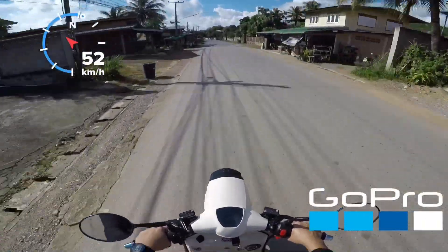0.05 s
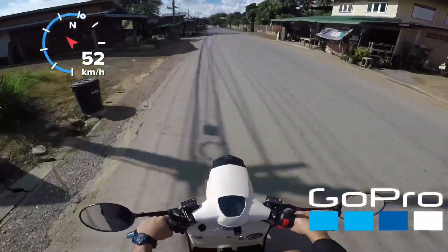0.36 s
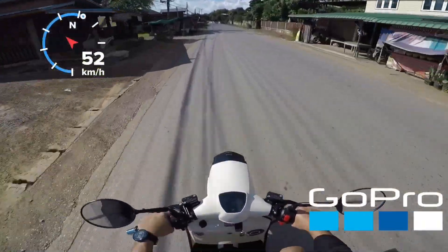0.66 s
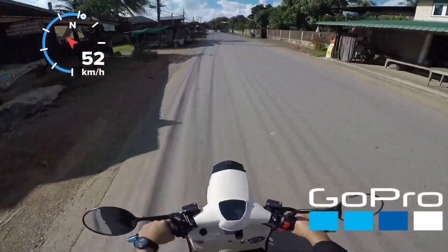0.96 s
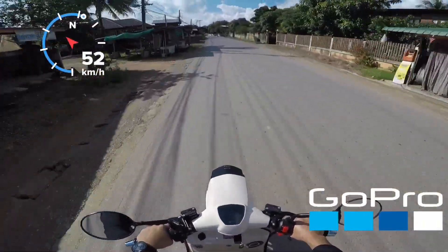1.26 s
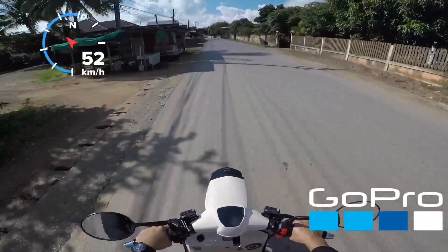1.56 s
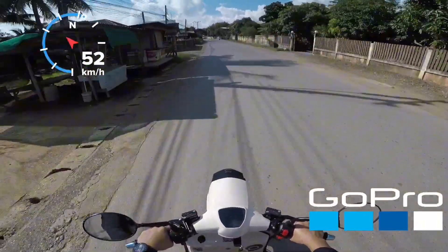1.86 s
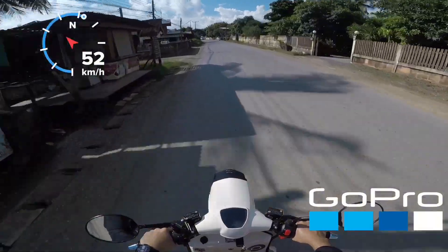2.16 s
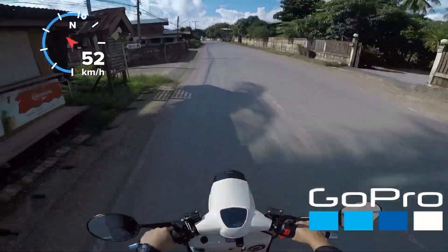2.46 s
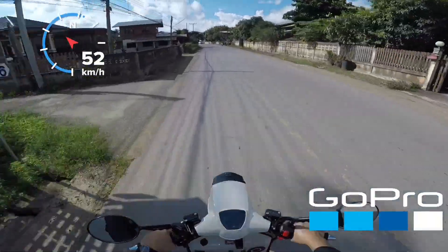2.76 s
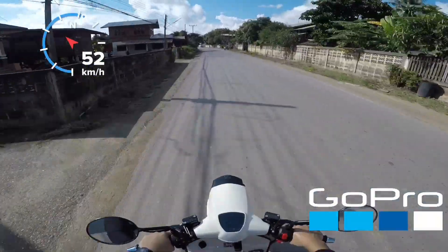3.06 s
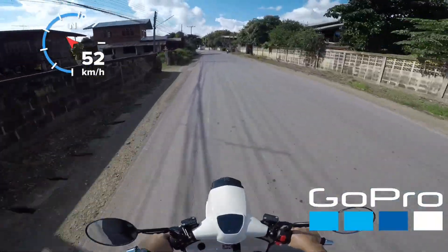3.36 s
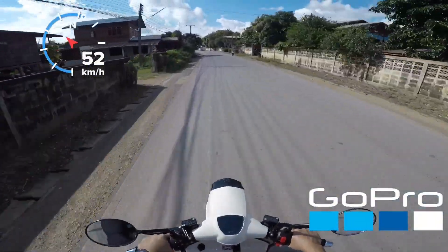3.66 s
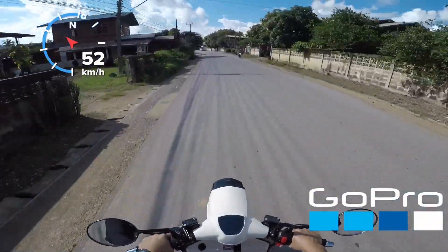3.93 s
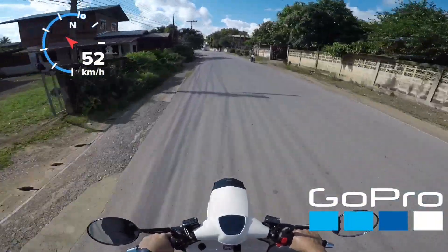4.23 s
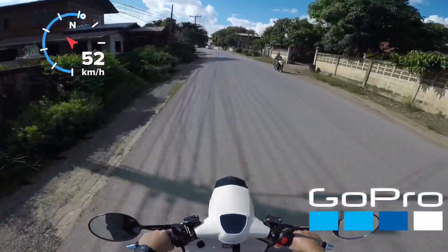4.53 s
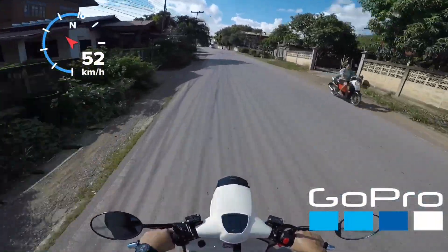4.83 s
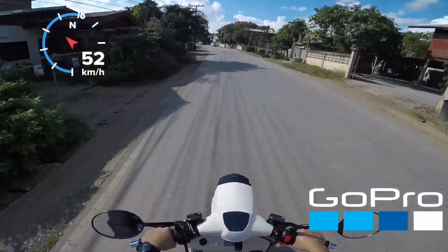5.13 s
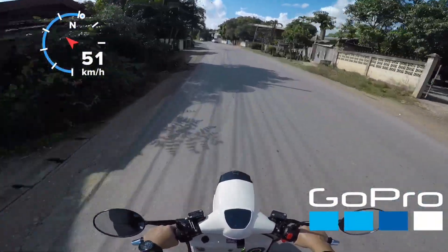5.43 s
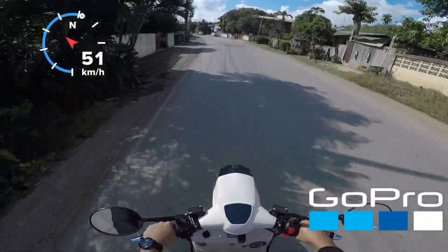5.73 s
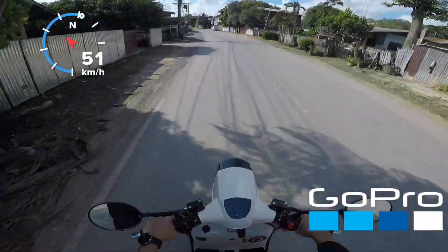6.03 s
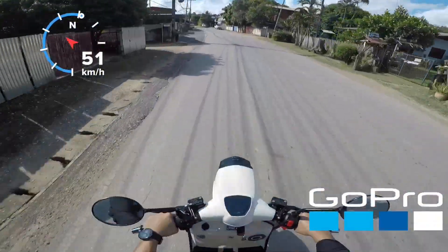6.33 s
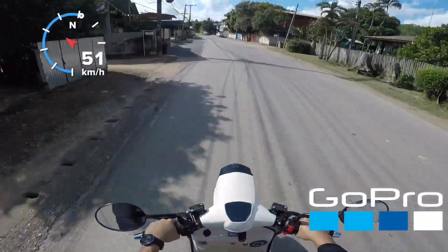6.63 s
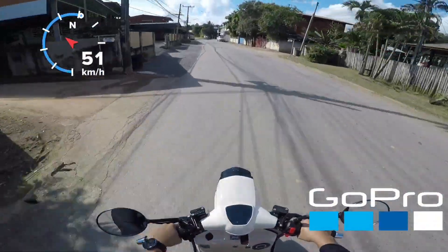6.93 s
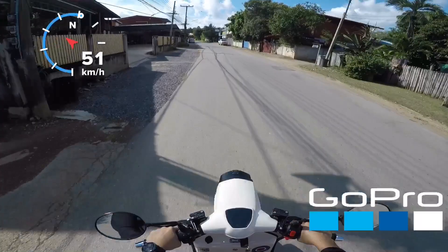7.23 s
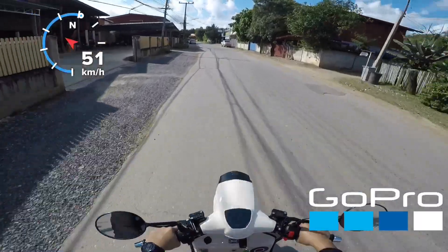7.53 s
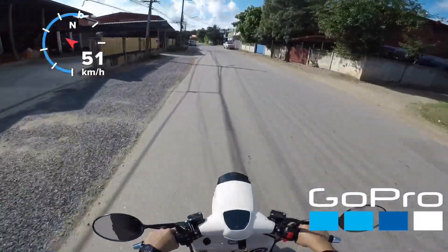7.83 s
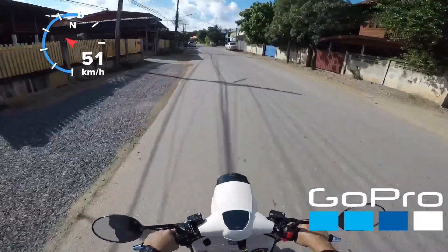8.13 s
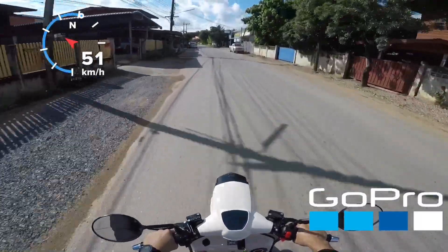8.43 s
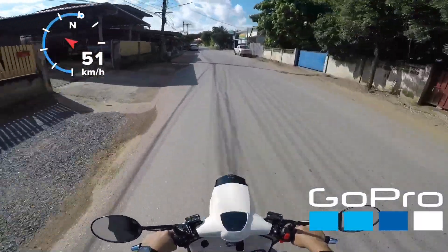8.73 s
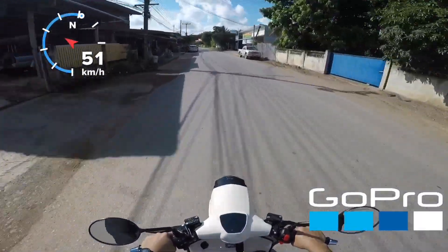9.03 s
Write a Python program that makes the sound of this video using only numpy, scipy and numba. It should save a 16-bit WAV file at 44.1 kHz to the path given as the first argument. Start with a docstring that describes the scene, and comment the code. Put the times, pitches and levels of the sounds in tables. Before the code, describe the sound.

Wind rumbles, rushes and hisses against the microphone during a scooter ride, with brief lulls and a faint low road rumble beneath.

```python
"""Scooter ride wind on the mic

Wind hits the two microphone ports of a camera on a scooter at about 50 km/h. Large eddies buffet each
port on its own or knock on both, smaller ones rush and tear past, the finest spit and hiss. The flow
swells in gusts, drones once and drops away in brief lulls, over a faint road rumble.
The camera widens the stereo image and holds the bass and the peaks down."""
import sys
import numpy as np
from scipy import signal
from scipy.fft import rfft, irfft, next_fast_len
from scipy.io import wavfile
from scipy.ndimage import uniform_filter1d, minimum_filter1d
from numba import njit

SR = 44100
rng = np.random.default_rng(int(sys.argv[2]) if len(sys.argv) > 2 else 0)


def waveform_to_disk(signal):
    """Save audio, clipped to [-1, 1], as 16-bit WAV at the path in sys.argv[1]."""
    frames = np.transpose(np.atleast_2d(signal))
    scaled = np.clip(frames, -1, 1) * 32767
    samples = np.round(scaled).astype(np.int16)
    wavfile.write(sys.argv[1], SR, samples)


N = 404838

# slow ride of the airflow over the ports: t/s, level/dB
FLOW = [(0, 0.5), (0.12, -1), (0.3, 1.5), (0.9, 1.5), (1.38, -0.5), (1.55, 1.0), (2.2, 0.4), (4.05, 0.5),
        (4.5, 1.5), (4.8, -2), (5.52, 1.5), (5.95, -0.9), (6.55, -3), (7.0, -2), (7.6, -1.5), (8.25, -1.5),
        (8.65, -0.5), (8.88, -1.4), (9.18, -0.5)]
# gusts on top of the flow: crest t/s, length/s, rise/dB
GUSTS = [(0.006, 0.03, 5.5), (0.42, 0.055, 1.5), (0.769, .12, 3.4), (0.947, 0.044, 3.5), (0.983, .06, 2.5),
         (1.06, 0.057, 1.5), (1.848, 0.2, 2), (2.568, 0.055, 1.5), (2.816, 0.076, 2), (3.057, 0.11, 0.5),
         (3.246, 0.052, 1), (3.416, 0.044, 1.5), (3.915, .12, 1.5), (4.174, 0.12, 2.5), (4.33, 0.05, 3),
         (4.493, .05, 1), (5, 0.033, 3), (5.047, .04, 5.5), (5.156, 0.096, 4), (5.474, 0.073, 2.5),
         (5.78, 0.14, 2.5), (5.946, 0.12, 3), (6.379, 0.07, 5), (6.645, 0.059, 3.5), (6.718, .07, 4),
         (6.848, 0.16, 4), (6.942, 0.14, 4.5), (7.03, .05, 3), (7.51, .12, 2.4), (8.127, .2, 2.5),
         (8.243, 0.06, 2.5), (8.335, 0.067, 3), (8.67, 0.054, -0.5), (9.128, .07, 2.5)]
# the flow lifts off the ports, and once, at 6.4 s, the whole sound dips for a moment: start t/s, end t/s,
# depth/dB (scaled per layer), let-go/s, catch/s
LULLS = [(1.08, 1.132, 2.8, .02, 0.022), (1.168, 1.21, 3.6, .012, 0.027), (1.328, 1.46, 1.3, .02, 0.033),
         (2.642, 2.728, 6.8, 0.07, 0.028), (2.871, 2.975, 9.2, 0.0099, 0.02),
         (3.167, 3.227, 5.3, .02, 0.022), (3.277, 3.402, 9.2, 0.02, 0.0075),
         (3.451, 3.51, 6.1, 0.014, .016), (3.542, 3.733, 6.9, 0.011, 0.2), (4.348, 4.463, 6.8, 0.016, .016),
         (5.262, 5.297, 5, .05, .008), (5.858, 5.874, 1.8, .015, .02), (6.403, 6.422, 4.2, .015, 0.023),
         (6.525, 6.545, 1.5, .015, .015), (6.759, 6.778, 3.3, .01, .012), (7.06, 7.095, 2.6, .012, .03),
         (7.709, 7.76, 2.1, 0.018, 0.033), (8.465, 8.533, 4, 0.028, 0.068),
         (8.941, 9.076, 3.5, 0.052, 0.02)]
# side the flow strikes from: t/s, left minus right/dB (scaled per layer)
FLOW_SIDE = [(0.0, -1), (0.6, -0.5), (2.1, 2), (3.8, 2), (4.45, 3), (4.85, -1), (5.4, 1.5), (6.15, -3),
             (7.6, 0), (8.55, 0), (9.16, 0.5)]
# tone of the turbulent pressure behind the ports: f/Hz, relative level/dB
TURBULENCE = [(24, -12), (66, -2), (110, 1.1), (175, -1.5), (340, -9.5), (480, -11), (640, -15),
              (1190, -20.5), (2190, -28.5), (4250, -41), (5090, -45), (6100, -43.5), (7770, -48.5),
              (10300, -68)]
# large eddies that thump a port: crest t/s, length/s, rise/dB, left minus right/dB
THUMPS = [(0.04, 0.071, -0.5, 0), (0.17, 0.21, 1, -2), (0.396, .2, 0, 4), (0.683, 0.17, 2, 4.5),
          (1.053, 0.11, 1.5, 2.5), (1.56, 0.23, -1.5, 6.5), (1.98, 0.22, -1.2, 11), (2.793, 0.08, 7, -3.5),
          (3.02, 0.16, 5, -8.5), (3.382, 0.067, 5.5, 6), (3.87, 0.22, 4, -4), (4.069, 0.16, 3, -2.5),
          (4.55, .14, -0.5, -2), (4.678, 0.074, 5, 0), (4.925, 0.5, 3, -2), (5.107, 0.15, 1.2, 5),
          (5.455, .13, 0, -2), (5.568, 0.16, -3, 10.5), (6.473, 0.18, 5.5, 5.5), (6.626, 0.33, 3, 3.5),
          (6.897, 0.51, 2.5, 6), (7.16, 0.058, 3.5, -1.5), (7.76, 0.3, 7.5, 1), (7.975, 0.31, 5, -1),
          (8.114, .1, 1.5, -2), (8.258, .11, 4, -1), (8.56, 0.18, 1, -1.5), (8.737, 0.22, 4.5, -2),
          (9.038, 0.62, 4, -1)]
# single eddies on both ports; the long ones boom: crest t/s, f/Hz, length/s, glide/(octaves/s), level/dB
KNOCKS = [(0.188, 80, .04, -6, -9.5), (0.56, 132, 0.028, 0, -8), (0.667, 108, 0.019, 0, -12),
          (1.065, 155, .026, 0, -10.5), (1.495, 90, 0.029, 0, -10), (2.293, 126, 0.082, -1, -11),
          (3.033, 89.6, 0.09, -1, -19), (3.384, 154, 0.019, 0, -12), (3.936, 122, 0.023, 0, -10),
          (4.161, 129, 0.018, 0, -10), (4.26, 150, 0.026, 0, -9), (4.68, 128, .035, -6, -7),
          (4.943, 135, .028, 0, -14), (5.3, 185, 0.042, -6, -12.5), (6.465, 136.6, 0.093, 5.5, -13),
          (6.623, 114, .054, -4, -6), (6.706, 110, .026, 0, -9), (6.762, 163, 0.025, 0, -6),
          (7.148, 215, 0.019, 0, -9), (7.534, 158, .028, 0, -7), (7.745, 128, .075, -4, -9),
          (7.92, 142, .028, -8, -2), (7.96, 99, 0.089, -2, -10), (8.105, 122, 0.2, 4, -13.5),
          (8.119, 190, 0.037, -6, -8), (8.262, 113, 0.07, -8, -8), (8.44, 102, 0.023, 0, -4),
          (8.545, 86, 0.095, 6, -13.5), (8.66, 87.6, 0.052, 8, -8), (9.139, 131, 0.029, 0, -8)]
# eddies peel off the camera in step and drone: t/s, f/Hz, level/dB
SHEDDING = [(1.8, 53, -40), (1.95, 54, -20), (2.12, 70, -20.5), (2.28, 60.6, -19.5), (2.38, 64, -27),
            (2.43, 86, -25), (2.52, 80, -12), (2.58, 79, -23), (2.64, 67, -45)]
# harmonics one to four of the drone: relative level/dB
DRONE_HARMONICS = [-1, 0.5, -3.5, -14]
# the right port rings a little higher than the left: f/Hz, left minus right/dB
PORT_MISMATCH = [(3000, 0), (6500, -0.5), (7300, -3), (8000, -6.5), (10000, -5)]
# the camera's EQ on the difference between the ports: f/Hz, gain/dB
WIDENING = [(40, -5.5), (107, -0.1), (250, 3), (480, 7), (740, 11.5), (900, 12.5), (2300, 3.5),
            (3300, -3.8), (4250, -5.5), (5100, 1.5), (5750, -.5), (7800, 0.5)]
# mix of each eddy size: base level/dB, response to flow/(dB/dB), drift/(dB/s), share of FLOW_SIDE
BUFFET = (-15.5, .5, -0.05, 1.04)
RUSH = (-21, 0.67, 0.22, 0.33)
TEAR = (-30.5, 1, 0.06, -0.3)
HISS = (-39.5, 1.11, -0.12, 1.5)

THROB_DB, THROB_PER_THUMP = -1.3, 0.8  # weight near 90 Hz in the rumble; its growth per dB of thump
BUFFET_PAN_DB, BUFFET_PAN_DB_PER_S = -1.8, -0.3  # the large eddies wander over to the right port
PAN_SPLIT = np.array([[.5], [-.5]])  # shares a left-minus-right balance between the ports


def buffet(flow_db):
    """The largest eddies thump each port on its own; the heavy ones gather into a deep throb."""
    thump_db = sum(db * swell(s, length) for s, length, db, _ in THUMPS)
    pan_db = sum(pan * swell(s, length) for s, length, _, pan in THUMPS)
    pan_db = pan_db + BUFFET_PAN_DB + drift(BUFFET_PAN_DB_PER_S)
    throb_db = THROB_DB + THROB_PER_THUMP * thump_db + 0.6 * flutter(2.5)[0]
    rumble = eddies(17, 330)
    throb = filtered(rumble, lambda f: 1 / (1 + (55 / f) ** 6 + (f / 135) ** 6))
    weighted = throb * undb(throb_db / 2) + (rumble - throb) * undb(-throb_db / 2)
    rocking_db = 0.5 * flutter(14, channels=2)  # lesser eddies rock each port at random
    thumping = in_step(weighted, thump_db) * undb(thump_db + rocking_db)
    return placed(thumping, BUFFET, flow_db, pan_db) * duck_under_drone(depth_db=1)


def in_step(ports, thump_db, narrowing=0.11):
    """A heavy eddy is wider than the gap between the ports, so it pushes on both more alike."""
    common = ports.mean(axis=0)
    return common * undb(narrowing * thump_db) + (ports - common) * undb(-narrowing * thump_db)


def wind(flow_db, lull_db):
    """Rush, tear and hiss: the smaller the eddies, the burstier they are and the more a lull takes away."""
    gust = flutter(32)  # covers both ports
    packet = flutter(190, channels=2)  # short packets of eddies hit one port at a time
    rush = unit(eddies(290, 1137) * undb(0.65 * gust + 1.27 * packet))
    tear = unit(eddies(1134, 3830) * undb(gust + 1.7 * packet))
    finest = eddies(2884, 12000)
    spit = flutter(900, channels=2)  # the finest break up in spits of about a millisecond
    hiss = unit(finest * undb(gust + 1.6 * packet + 0.89 * spit))
    # a lull shelters the right port more than the left
    return (placed(rush, RUSH, flow_db - 0.81 * lull_db, pan_db=0.61 * lull_db + 1.0)
            + placed(tear, TEAR, flow_db - 0.62 * lull_db, pan_db=0)
            + placed(hiss, HISS, flow_db - 1.47 * lull_db, pan_db=lull_db))


def knocks():
    """Compact eddies roll over the camera: a few cycles each, alike in both ports, some with a glide."""
    out = np.zeros(N)
    for crest_s, hz, length_s, glide, db in KNOCKS:
        envelope = swell(crest_s, length_s)
        active = np.flatnonzero(envelope > 1e-6)
        t = active / SR - crest_s
        cycles = hz * (t + np.log(2) * glide * t ** 2 / 2)
        out[active] += undb(db) * envelope[active] * np.sin(2 * np.pi * cycles)
    return out


def drone():
    """Eddies shed at a nearly even rate hum in both ports, then break up into rumble again."""
    rate_hz, level_db = curves(SHEDDING)
    t = np.arange(N) / SR
    gate = (t > SHEDDING[0][0]) & (t < SHEDDING[-1][0])
    wavering_hz = rate_hz * (1 + 0.0175 * flutter(12.7)[0])
    phase = 2 * np.pi * np.cumsum(wavering_hz) / SR
    hum = sum(undb(db + 2.1 * flutter(8, channels=2)) * np.sin(k * phase)
              for k, db in enumerate(DRONE_HARMONICS, 1))
    return unit(hum) * undb(level_db) * gate


def duck_under_drone(depth_db):
    """Gain of the loose rumble, which gives way as the eddies fall in step."""
    _, drone_db = curves(SHEDDING)
    return undb(-depth_db * undb(drone_db - drone_db.max()))


def road():
    """The road shakes the whole camera, so both ports get the same deep rumble around 21 Hz."""
    shake = filtered(rng.standard_normal(N), lambda f: 1 / np.hypot(1, 2.4 * (f / 21 - 21 / f)))
    return unit(shake) * undb(-51)


def airflow():
    """Strength of the flow in dB: its slow ride, the gusts and a slight constant waver."""
    slow_db, = curves(FLOW)
    gust_db = sum(db * swell(s, length) for s, length, db in GUSTS)
    return slow_db + gust_db + 0.16 * flutter(5.3)[0]


def lulls():
    """Dip in dB while the flow is off the ports; each lull lets go and catches again at its own pace."""
    t = np.arange(N) / SR
    return sum(db * np.clip(np.minimum((t - start) / let_go_s, (end - t) / catch_s) + .5, 0, 1)
               for start, end, db, let_go_s, catch_s in LULLS)


def eddies(low_hz, high_hz):
    """Pressure noise from one range of eddy sizes; each port meets its own."""
    def band(f):
        return response(TURBULENCE, f) / np.sqrt((1 + (low_hz / f) ** 8) * (1 + (f / high_hz) ** 8))
    return unit(filtered(rng.standard_normal((2, N)), band))


def placed(ports, layer, flow_db, pan_db):
    """The flow rides a layer's level and balance; pan_db leans it further left."""
    base_db, per_flow, drift_db_per_s, side_share = layer
    side_db, = curves(FLOW_SIDE)
    balance_db = (side_share * side_db + pan_db) * PAN_SPLIT
    return ports * undb(base_db + per_flow * flow_db + drift(drift_db_per_s) + balance_db)


def swell(crest_s, length_s):
    """An eddy passing by: a smooth rise from 0 to 1 and back."""
    from_crest = (np.arange(N) / SR - crest_s) / length_s
    return np.cos(np.pi * np.clip(from_crest, -.5, .5)) ** 2


def flutter(rate_hz, channels=1):
    """Random modulation at rms 1, no faster than about rate_hz."""
    return unit(filtered(rng.standard_normal((channels, N)), lambda f: 1 / (1 + (f / rate_hz) ** 2)))


def drift(db_per_s):
    """A steady fade in dB that passes zero halfway through the ride."""
    return db_per_s * (np.arange(N) - N / 2) / SR


def curves(table):
    """One automation curve for each column after t/s."""
    times, *columns = np.transpose(table)
    return [np.interp(np.arange(N) / SR, times, column) for column in columns]


def response(points, f):
    """Gain at frequencies f of an EQ curve drawn through f/Hz, level/dB points."""
    hz, db = np.transpose(points)
    return undb(np.interp(np.log(f), np.log(hz), db))


def filtered(x, gain):
    """EQ by a function that gives the gain at each frequency."""
    size = next_fast_len(N, real=True)
    f = np.maximum(np.arange(size // 2 + 1) * SR / size, 1)
    return irfft(rfft(x, size) * gain(f), size)[..., :N]


def undb(db):
    """Decibels to gain."""
    return 10 ** (np.asarray(db) / 20)


def unit(x):
    """Scale to rms 1."""
    return x / np.sqrt(np.mean(x ** 2))


def widen(x, leak, leak_top_hz):
    """Lift the side signal, most in the mids; a little leaks into the centre, a quarter cycle ahead."""
    side = filtered((x[0] - x[1]) / 2, lambda f: response(WIDENING, f))
    leaked = filtered(side, lambda f: 1j * leak * (f / leak_top_hz) / (1 + (f / leak_top_hz) ** 10))
    mid = (x[0] + x[1]) / 2 + leaked
    return np.array([mid + side, mid - side])


def bass_compressor(x, crossover_hz, threshold_db, squeeze, window_s):
    """Take the share squeeze off the bass above threshold, so the heaviest buffets land about level."""
    bass = filtered(x, lambda f: 1 / (1 + (f / crossover_hz) ** 4))
    power = uniform_filter1d(np.mean(bass ** 2, axis=0), int(window_s * SR))
    excess_db = np.maximum(10 * np.log10(np.maximum(power, 1e-9)) - threshold_db, 0)
    reduction_db = squeeze * uniform_filter1d(excess_db, int(window_s * SR / 2))
    return x + bass * (undb(-reduction_db) - 1)


@njit
def follow_peaks(rectified, fall):
    """Peak follower: jumps up at once and sinks by the factor fall each sample."""
    out, held = np.empty(len(rectified)), 0.
    for i in range(len(rectified)):
        held = max(rectified[i], held * fall)
        out[i] = held
    return out


def limiter(x, ceiling_db, release_s, smooth_samples=129):
    """A heavy thump ducks both channels for a moment."""
    peak = follow_peaks(np.abs(x).max(axis=0), np.exp(-1 / (release_s * SR)))
    gain = undb(ceiling_db) / np.maximum(peak, undb(ceiling_db))
    return x * uniform_filter1d(minimum_filter1d(gain, smooth_samples), smooth_samples)


def scene():
    """Wind and road rumble, coloured by the two slightly unlike ports."""
    flow_db, lull_db = airflow(), lulls()
    air = buffet(flow_db - 0.82 * lull_db) + wind(flow_db, lull_db)
    mix = air + knocks() + road() + drone()
    return filtered(mix, lambda f: response(PORT_MISMATCH, f) ** PAN_SPLIT)


def record(dry):
    """The camera widens the image, holds the bass down, limits the peaks and cuts the top."""
    wide = widen(dry, leak=0.46, leak_top_hz=3160)
    tight = bass_compressor(wide, crossover_hz=420, threshold_db=-13.5, squeeze=0.85, window_s=0.022)
    limited = limiter(tight, ceiling_db=-.3, release_s=0.05)
    high_cut = signal.ellip(8, .2, 70, 10600, fs=SR, output="sos")
    return signal.sosfilt(high_cut, limited)


dry = scene()
out = record(dry)
waveform_to_disk(out)
```